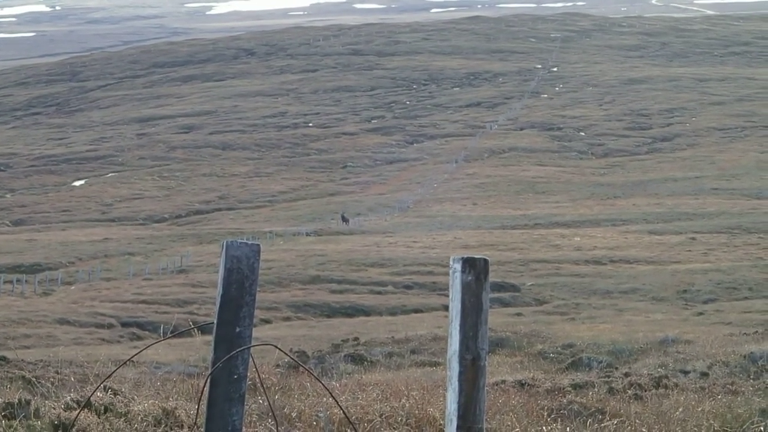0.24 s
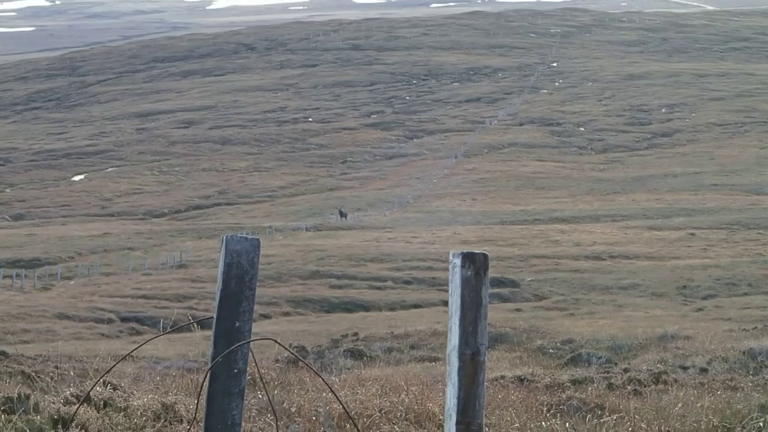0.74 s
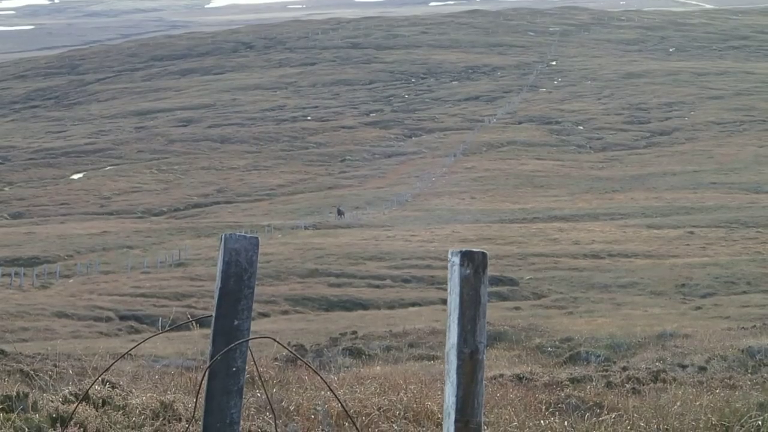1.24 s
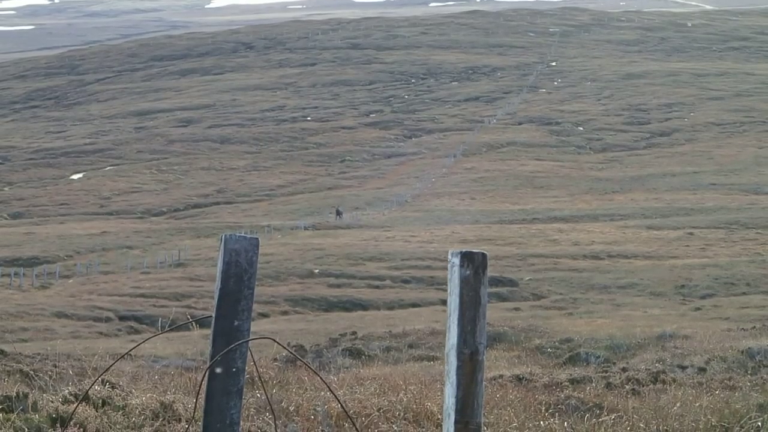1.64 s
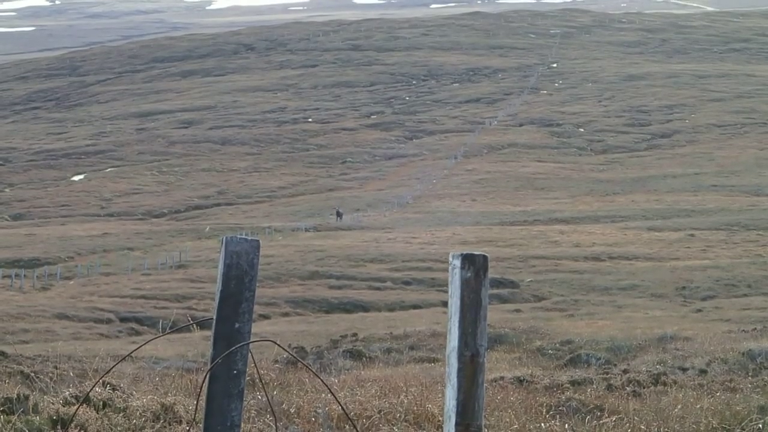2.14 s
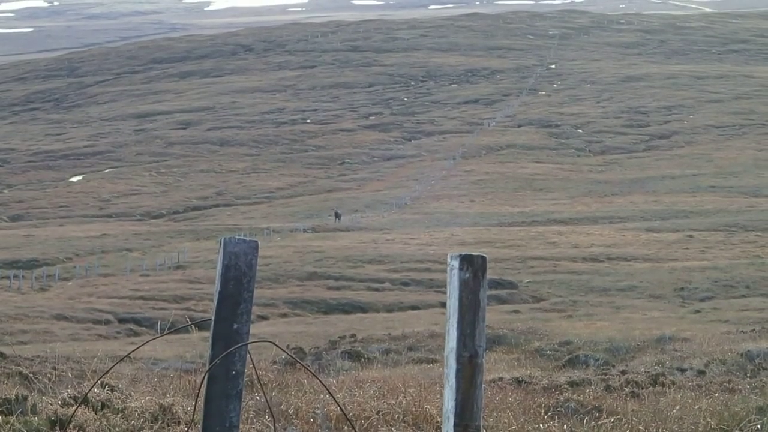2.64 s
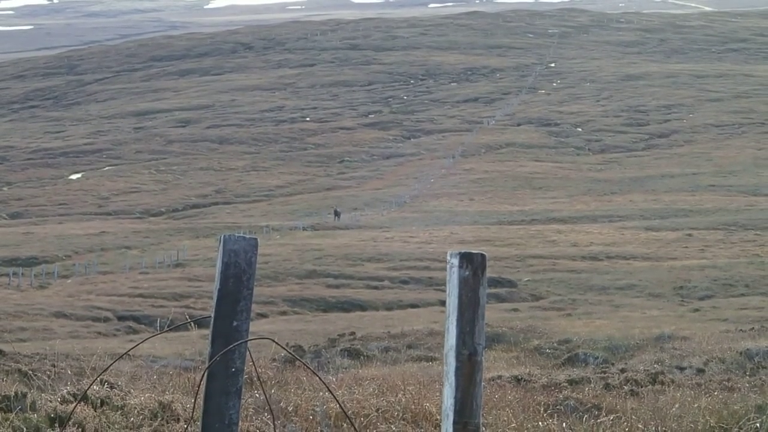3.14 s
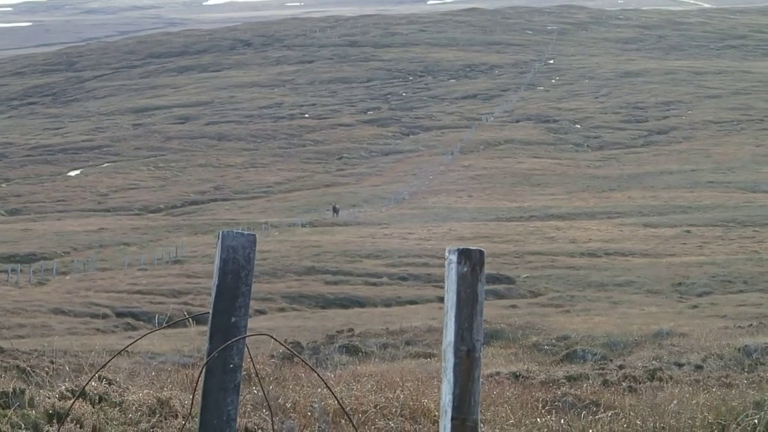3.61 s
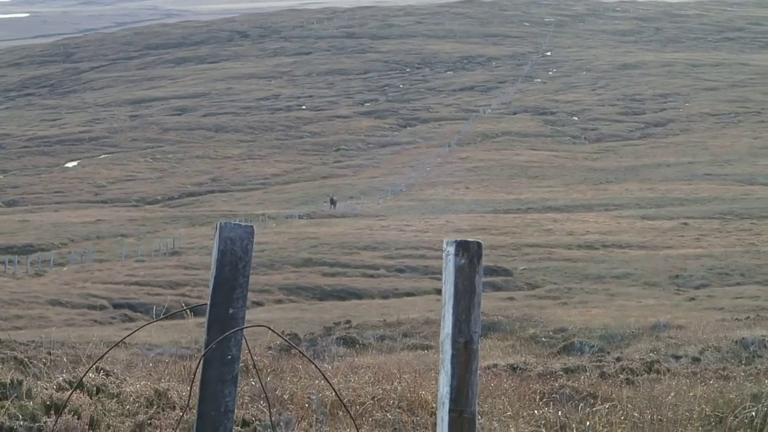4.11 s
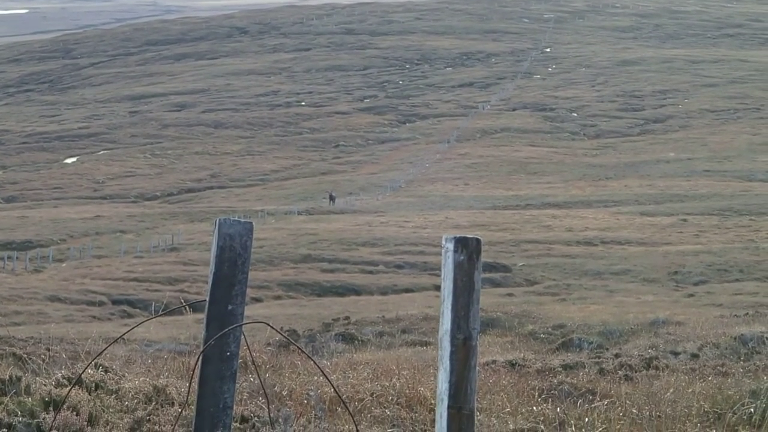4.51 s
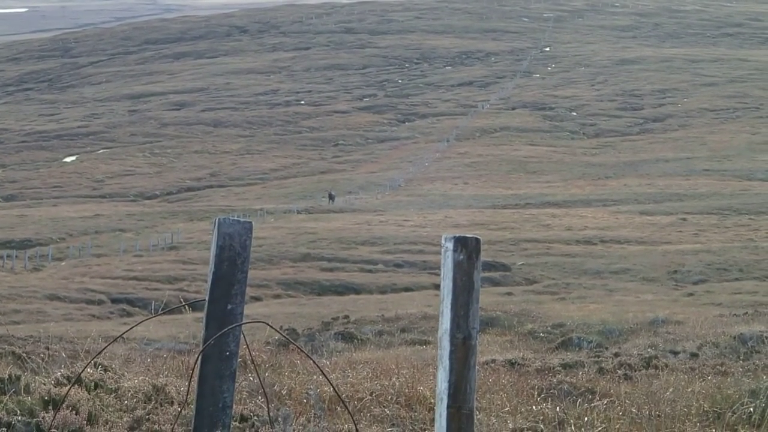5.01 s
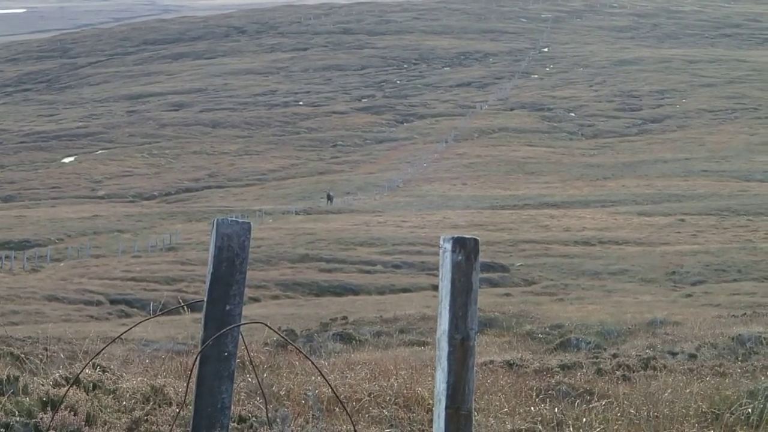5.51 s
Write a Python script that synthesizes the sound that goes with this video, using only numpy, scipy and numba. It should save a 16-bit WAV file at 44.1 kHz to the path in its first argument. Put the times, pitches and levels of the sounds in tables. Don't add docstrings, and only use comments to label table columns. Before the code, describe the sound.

Open moorland, with a red deer stag far away and slightly right of centre. From the start it is giving a long roar, weak and muffled at first, then louder and more open by about 1 second. Rapid, rough throat pulses buzz through resonances that slide downward, while the pitch climbs from roughly 75 to a little above 100 hertz, cracks at about 2.2 and 2.6 seconds, and settles lower. The roar stops abruptly near 3.7. After a 0.4-second gap, a second roar begins at 4.1, jumps up, darkens quickly, then slips lower in steps around 5 to 5.5 and continues to the end. Distance thins the bass; slopes return very faint, dull echoes. Beneath are steady wide microphone hiss, slight grass rustle, tiny regular camera ticks about thirty per second, one small body creak at 0.7, and faint focus-motor whirrs, notably near 2.1, 3.0, 3.5 and 4.7.

```python
import sys
import numpy as np
from scipy import signal
from scipy.fft import rfft, irfft
from scipy.io import wavfile
from scipy.ndimage import uniform_filter1d
from numba import njit

SR = 44100
rng = np.random.default_rng(int(sys.argv[2]) if len(sys.argv) > 2 else 0)


def volts(x):
    e = np.asarray(x, float) / 20
    return 10 ** e


def log_audio(samples):
    frames = np.atleast_2d(samples).T
    limited = np.clip(frames, -1, 1)
    pcm = np.round(limited * 32767).astype(np.int16)
    wavfile.write(sys.argv[1], SR, pcm)


N = 254016

# start in seconds, end in seconds.
ROARS_S = [
    (-.2, 3.727),
    (4.127, 6.0),
]
ATTACK_S, RELEASE_S, EDGE_DB = 0.1, 0.037, -13

# time in seconds, height (0 = pulled down, 1 = at rest), hoarseness 0-1.
LARYNX = [
    [(.14, 0.9, .11), (.33, 0.4, 0.1), (.6, 0.13, 0.16), (.95, 0.042, 0.16), (2.15, .001, 0.11),
     (2.33, -0.01, 0.039), (2.66, 0.00094, 0.047), (2.78, 0.041, 0.027), (3.72, 0.0084, 0.035)],
    [(4.13, 0.86, 0.12), (4.2, .6, 0.13), (4.28, 0.425, 0.037), (4.38, 0.285, .037), (4.55, 0.082, 0.078),
     (4.97, -0.015, 0.063), (5.4, 0.052, .07), (5.76, 0.093, .1)],
]

# time in seconds, pitch in Hz before the breaks.
TENSION = [
    [(0, 72.6), (.3, 80.6), (.41, 79), (.56, 89.4), (.76, 93.9), (.97, 102.6), (1.11, 95.44), (1.19, 96.5),
     (1.41, 92.7)],
    [(1.56, 93.24), (1.72, 97), (1.99, 95.3), (2.21, 99.3), (2.37, 103.8), (2.62, 103), (2.9, 101.8),
     (3.6, 100.1), (3.75, 98.4)],
    [(4.11, 78.5), (4.21, 78.8), (4.39, 89.24), (4.48, 89.8), (4.75, 87.43), (4.914, 83.77), (5.0, 77.84),
     (5.52, 76.34), (5.76, 73.96)],
]

# start in seconds, length in seconds, pitch step in Hz,
# hoarseness 0-1.
BREAKS = [
    [(.15, 0.18, 20.5, 0.08), (.56, 0.024, 3.5, .01), (1.19, .11, -9, 0.09), (2.155, .06, 12, 0.14),
     (2.63, .12, -19, 0.16), (3.6, .12, -11.5, 0.08)],
    [(4.132, .08, 37.5, 0.06), (5.0, .07, -5, 0.11), (5.216, .138, -6, 0.05), (5.478, .04, -5.5, 0.03)],
]

# time in seconds, level in dB, brightness in dB, tongue forward in dB, soft palate raised in dB.
EFFORT = [(.1, -54, -13, -6.5, -8.5), (.27, -52, -6, -0.5, -12), (.62, -49, -2.3, 5.5, -4),
          (.95, -44, .1, 0.5, -1.5), (1.25, -46, -2, 3, -1.5), (1.45, -44.5, 0.5, 5.5, 1.5),
          (1.95, -47, -2.5, -3, -6.5), (2.1, -46.5, 1, 3.5, 1), (2.45, -45, 1, -4.5, -1),
          (2.8, -43, 0.5, 1, -0.5), (3.1, -42.5, 0.5, -1.5, 2), (3.52, -44, 3, 7, .1),
          (4.2, -42, 5.5, -2, -8), (4.4, -42, 6, -1, -12.5), (4.55, -41.5, 5, 3, -10.5),
          (4.85, -42, 0.5, 3.5, -7), (5.07, -43, 1, 0, 1.5), (5.76, -45, 3, 4.5, -3)]

# middle in seconds, half length in seconds, swell in dB,
# mouth opening in dB.
PUSHES = [(.33, 0.027, 3.5, -6), (1.25, 0.033, -0.5, -3), (1.33, 0.05, 2.5, -3.3), (2.09, 0.057, 4, -11),
          (2.215, 0.037, 5, -7.5), (2.4, 0.069, 3, -1.5), (2.6, 0.024, 0.5, -1), (2.685, .03, 2.5, -7),
          (2.73, 0.02, -2.5, -4), (3.66, 0.22, 0, -7.5), (4.41, 0.03, 4.5, -1), (5.02, 0.02, -3, -7),
          (5.47, .04, 2.5, -1)]
EVENING = 1

# centre in Hz, width in Hz, level in dB.
FORMANTS = [(549.3, 52, 3), (666.5, 138, -2), (750, 117, 3), (978.5, 69, 13.5), (1352, 114, -3),
            (1622, 37, -5.5), (1888, 73, 10), (2117, 54, 5), (2345.4, 118, 1.5), (2691, 127, 4),
            (3248, 210, -15.5), (3852, 44, -9)]
# tract part (0 low, 1 middle, 2 high); share of the larynx slide (least in the muzzle);
# sign (neighbours in opposite phase add up between tops); shares of tongue, mouth, strain and palate in dB per dB.
TRACT_PART = [0, 0, 0, 1, 1, 2, 2, 2, 2, 2, 2, 2]
SLIDE_SHARE = [1, 1, 1, 1, .7, 1.5, 1, 1, 1, .4, .1, .1]
POLARITY = [1, -1, 1, 1, 1, 1, 1, 1, 1, 1, 1, 1]
TONGUE_SHARE = [0, 0, 0, 0, 0, 0, -1, 1, .5, 0, 0, 0]
MOUTH_SHARE = [0, 0, 0, 0, 0, -1, 0, 0, .5, 1, 1, 1]
STRAIN_SHARE = [0, 0, 0, 0, 0, 0, 0, 0, 0, 0, 1, .5]
PALATE_SHARE = [-.1, -.2, -.4, 1, .25, 0, 0, 0, 0, 0, 0, 0]

SHORTENING = [(.25, 1.34, -0.0074), (0.463, 1.075, -0.01), (.25, 1.01, -0.00049)]
MOUTH_SHUT_DB, MOUTH_POWER = -23, 0.58
STRAIN_DB, STRAIN_PER_BRIGHT_DB = 6, 0.53

# centre in Hz, width in Hz.
NASAL_DIPS = [(870, 6.7), (1120, 50), (1750, 660), (2570, 85)]

BAND_EDGES_HZ = 860, 1150, 1750
REGISTER_DB = [-4, -4.5, 5, 0]
GROUND_HZ, STAG_PAN_DB = 515, -2.2

# delay in seconds, left level in dB, right level in dB.
ECHOES = [(.021, -26, -26), (.047, -30, -25), (.09, -29.5, -31), (.16, -32, -29), (.27, -34.5, -33)]

# frequency in Hz, density in dB per Hz.
HISS_SPECTRUM = [(20, -44), (102, -14), (156, -8), (305, -4.5), (506, -3.5), (1020, -7), (2120, -9.5),
                 (3400, -14.5), (4700, -14.5), (5500, -15), (6800, -17.5), (16000, -19.5)]
HISS_DB = -51

# centre in Hz, width in Hz, level in dB.
FRAME_MODES = [(5724, 300, -38.5), (6040, 350, -43)]
FRAME_RATE_HZ, FIRST_FRAME_S = 29.97, 0.0165

# time in seconds, peak in dB.
CREAKS = [
    (0.7188, -49),
]

# middle in seconds, half length in seconds, level in dB.
FOCUS_HUNTS = [(1.398, 0.12, -72), (2.093, 0.18, -61), (2.996, 0.095, -65), (3.45, 0.067, -63),
               (4.697, .1, -65), (4.999, 0.076, -67), (5.505, 0.087, -70)]
MOTOR_IDLE_DB = -83

PORT_DIP_HZ, PORT_DIP_WIDTH_HZ, PORT_DIP_DEPTH = 4080, 500, 0.87
CUTOFF_HZ = 15700


def stag():
    step_hz, rasp = breaks()
    swell_db, gape_db = bumps(PUSHES)
    height, hoarse = in_time(LARYNX[0] + LARYNX[1])
    level_db, bright_db, tongue_db, palate_db = in_time(EFFORT)
    pitch_hz = in_time(sum(TENSION, []))[0] + step_hz
    pulses = vocal_folds(pitch_hz, np.clip(hoarse + rasp, 0, 1))
    voice = rfft(throat(pulses, height, gape_db, tongue_db, palate_db, bright_db))

    hz = np.arange(len(voice)) * SR / N
    below = [0, *[1 / (1 + (hz / edge_hz) ** 30) for edge_hz in BAND_EDGES_HZ], 1]
    registers = []
    for db, lower, upper in zip(REGISTER_DB, below, below[1:]):
        registers.append(volts(db) * irfft(voice * (upper - lower), N))
    out = rms_one(sum(registers[:3]) + volts(bright_db) * registers[3])

    power = uniform_filter1d(uniform_filter1d(out ** 2, size=1500), size=1500).clip(1e-9)
    evened = out / power ** (EVENING / 2)
    return volts(level_db + swell_db) * breath() * evened


def vocal_folds(pitch_hz, hoarse):
    turns = np.cumsum(pitch_hz * (1 + 0.03 * hoarse * drift(31))) / SR
    closures = np.sin(111 * np.pi * turns) / (np.sin(np.pi * turns) + 1e-12)
    puffs = rng.standard_normal(N) * (0.5 + 0.5 * np.cos(2 * np.pi * turns)) ** 2
    return rms_one(closures) * volts(6 * hoarse * drift(30)) + 5 * hoarse * puffs


def throat(source, height, gape_db, tongue_db, palate_db, bright_db):
    shortening = []
    for share, power, offset in SHORTENING:
        shortening.append(share * np.sign(height) * np.abs(height) ** power + offset)
    mouth_db = MOUTH_SHUT_DB * np.clip(height, 0, 1) ** MOUTH_POWER + gape_db
    strain_db = STRAIN_DB + STRAIN_PER_BRIGHT_DB * bright_db
    out = np.zeros(N)
    for k, (hz, width_hz, db) in enumerate(FORMANTS):
        centre_hz = hz * (1 + SLIDE_SHARE[k] * shortening[TRACT_PART[k]])
        twice_cos = 2 * np.cos(2 * np.pi * centre_hz / SR)
        gain_db = db + TONGUE_SHARE[k] * tongue_db + MOUTH_SHARE[k] * mouth_db
        gain_db = gain_db + STRAIN_SHARE[k] * strain_db + PALATE_SHARE[k] * palate_db
        gain_db = gain_db + 1.5 * drift(7)
        r = np.exp(-np.pi * width_hz / SR)
        once = moving_resonance(source, twice_cos, r)
        twice = moving_resonance(once, twice_cos, r)
        out += POLARITY[k] * volts(gain_db) * (twice + (-1) ** k * 0.11 * once)
    for hz, width_hz in NASAL_DIPS:
        out = dip(out, hz, width_hz, depth=0.87)
    return band(out, GROUND_HZ, 3830, order=6)


@njit
def moving_resonance(x, twice_cos, r):
    y = np.zeros(len(x))
    for i in range(2, len(x)):
        drive = (1 - r * r) / 2 * (x[i] - x[i - 2])
        y[i] = drive + r * twice_cos[i] * y[i - 1] - r * r * y[i - 2]
    return y


def breaks():
    time_s, out = np.arange(N) / SR, np.zeros((2, N))
    for (_, end_s), rows in zip(ROARS_S, BREAKS):
        for start_s, length_s, step_hz, hoarse in rows:
            done = np.clip((time_s - start_s) / length_s, 0, 1)
            out[0] += step_hz * done * (time_s < end_s + 0.2)
            out[1] += hoarse * np.sin(np.pi * done)
    return out


def breath():
    time_s, out = np.arange(N) / SR, np.zeros(N)
    for start_s, end_s in ROARS_S:
        edge = np.minimum((time_s - start_s) / ATTACK_S, (end_s - time_s) / RELEASE_S)
        out += (edge > 0) * volts(EDGE_DB * (1 - np.clip(edge, 0, 1)) ** 2)
    return out


def slopes(x):
    response = np.zeros((2, SR // 3))
    for delay_s, left_db, right_db in ECHOES:
        at = round(delay_s * SR)
        smear = rng.standard_normal((2, 1300)) * np.hanning(1300) / 22
        response[:, at:at + 1300] += volts([[left_db], [right_db]]) * smear
    echo = signal.fftconvolve(x[None], response, axes=1)[:, :N]
    return band(echo, 360.32, 5600, order=1)


def grass():
    rustle = rms_one(band(rng.standard_normal((2, N)), 4570, 6500))
    return volts(-68.5 + 0.66 * drift(6.8)) * rustle


def camera():
    frames = np.arange(int(N / SR * FRAME_RATE_HZ))
    at = ((FIRST_FRAME_S + frames / FRAME_RATE_HZ) * SR).astype(int)
    knocks = np.full(N, 1e-18)
    knocks[at] = volts(rng.normal(0, 1.7, len(at)))
    whirr = focus_motor()
    for hz, width_hz, db in FRAME_MODES:
        whirr = whirr + volts(db) * 20 * band(knocks, hz - width_hz / 2, hz + width_hz / 2, order=2)
    creak = 1e-12 * rng.standard_normal(N)
    for s, db in CREAKS:
        creak[round(s * SR)] = volts(db + 3.5)
    return whirr * volts([[-3.2], [2]]) * [[1], [-1]] + band(creak, 2600, 12000, order=1)


def focus_motor():
    hunts = bumps([(s, half_s, volts(db)) for s, half_s, db in FOCUS_HUNTS])[0]
    drive = volts(MOTOR_IDLE_DB + drift(5.7)) + hunts
    noise = rng.standard_normal(N) + 0.86 * rng.standard_normal((2, N))
    return drive * rms_one(band(noise, 5000, 6170))


def hiss():
    hz = np.maximum(np.arange(N // 2 + 1) * SR / N, 1)
    point_hz, point_db = np.transpose(HISS_SPECTRUM)
    colour = volts(np.interp(np.log(hz), np.log(point_hz), point_db))
    noise = rms_one(irfft(rfft(rng.standard_normal((2, N))) * colour, N))
    return volts(HISS_DB) * noise * volts([[-0.35], [0.35]])


def rms_one(x):
    return x / np.sqrt(np.mean(x ** 2) + 1e-20)


def in_time(rows):
    s, *columns = np.transpose(rows)
    return [np.interp(np.arange(N) / SR, s, column) for column in columns]


def bumps(rows):
    time_s = np.arange(N) / SR
    return sum(np.exp(-((time_s - s) / half_s) ** 2) * np.array(columns)[:, None] for s, half_s, *columns in rows)


def drift(rate_hz):
    r = np.exp(-2 * np.pi * rate_hz / SR)
    return rms_one(signal.lfilter([1], [1, -2 * r, r * r], rng.standard_normal(N + SR))[SR:])


def band(x, low_hz, high_hz, order=3):
    return signal.sosfilt(signal.butter(order, [low_hz, high_hz], "band", fs=SR, output="sos"), x)


def dip(x, hz, width_hz, depth=1):
    notched = signal.lfilter(*signal.iirnotch(hz, hz / width_hz, SR), x)
    return (1 - depth) * x + depth * notched


def scene():
    roar = stag()
    direct = roar * volts([[STAG_PAN_DB / 2], [-STAG_PAN_DB / 2]])
    return direct + slopes(roar) + grass() + camera() + hiss()


def low_pass(x):
    return signal.sosfilt(signal.butter(12, 16960, fs=SR, output="sos"), x)


def record(dry):
    heard = dip(dry, PORT_DIP_HZ, PORT_DIP_WIDTH_HZ, PORT_DIP_DEPTH)
    heard = signal.sosfilt(signal.ellip(12, 0.3, 70, CUTOFF_HZ, fs=SR, output="sos"), heard)
    return low_pass(heard)


dry = scene()
out = record(dry)
log_audio(out)
```